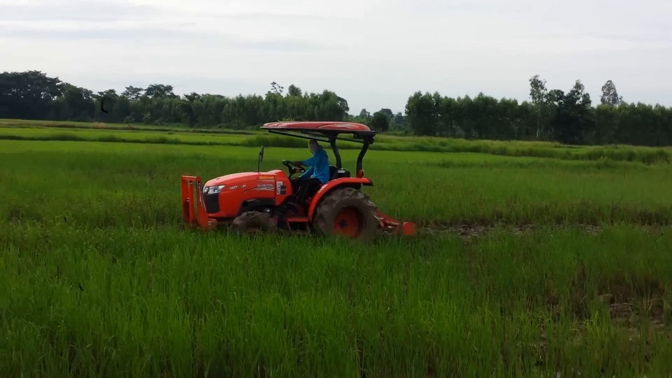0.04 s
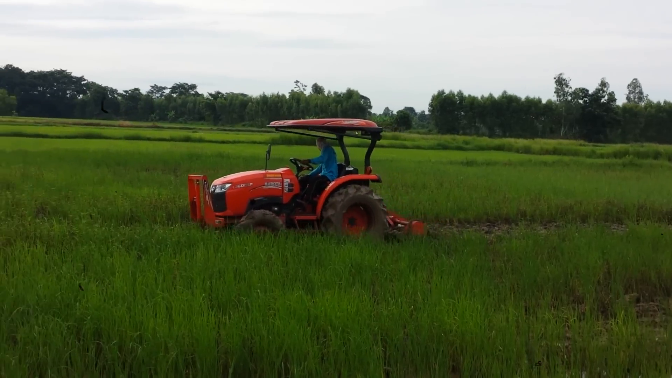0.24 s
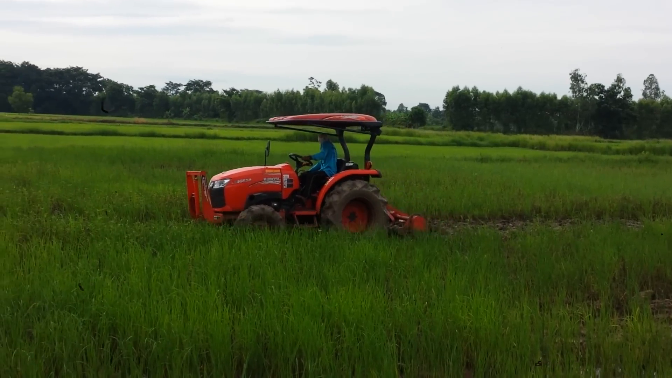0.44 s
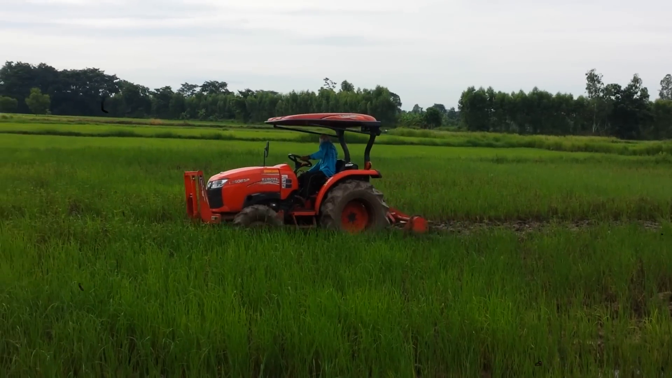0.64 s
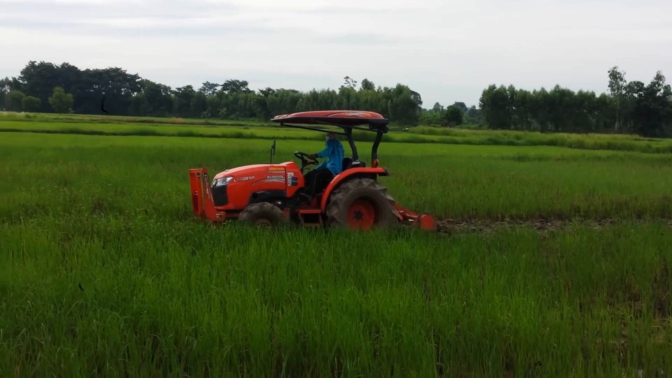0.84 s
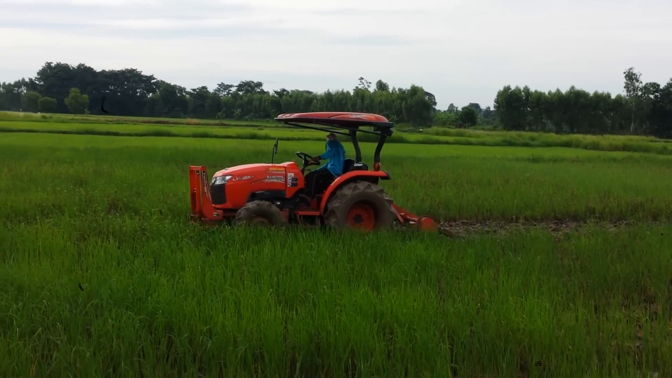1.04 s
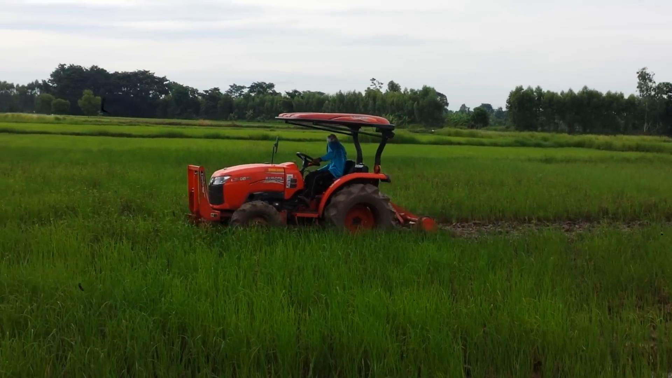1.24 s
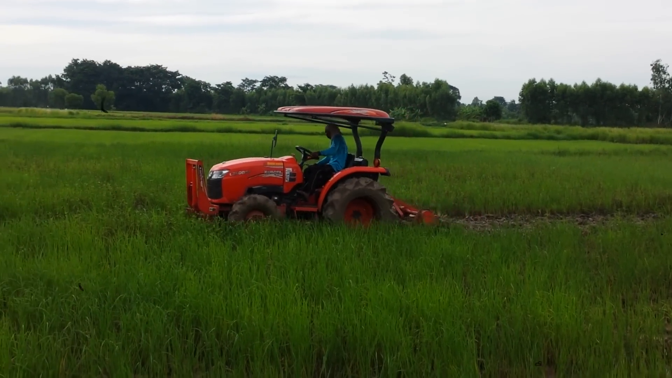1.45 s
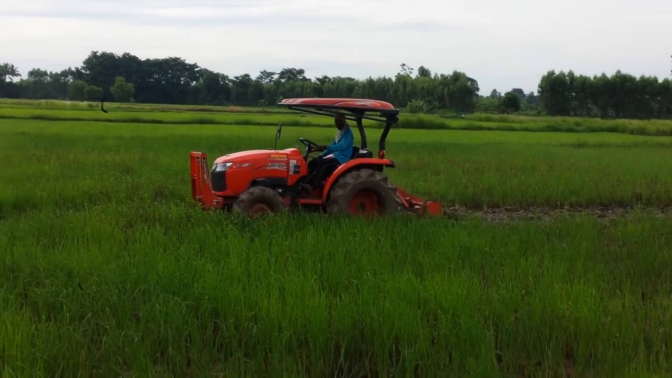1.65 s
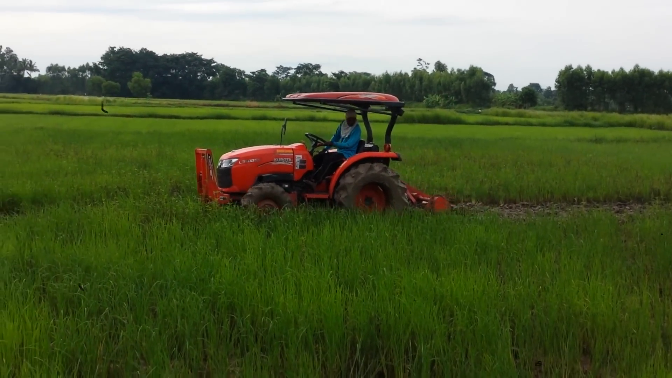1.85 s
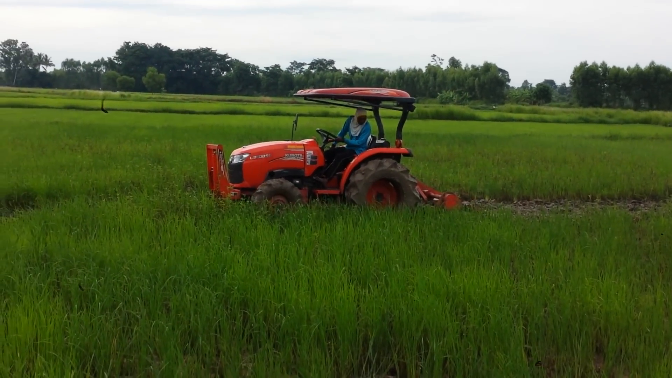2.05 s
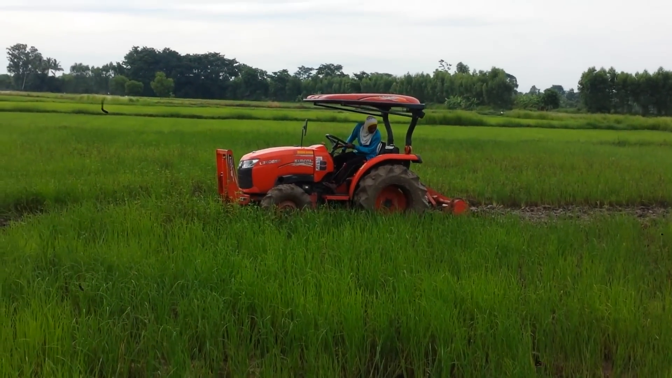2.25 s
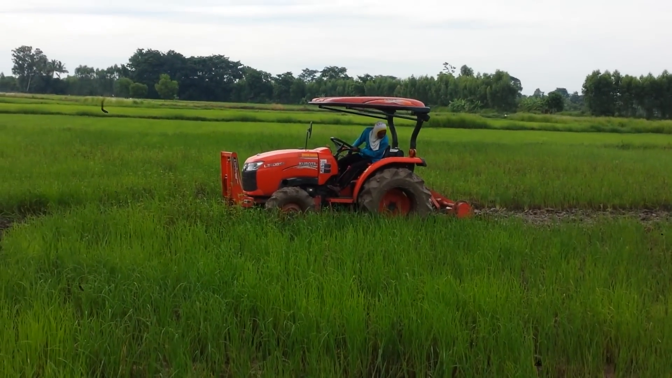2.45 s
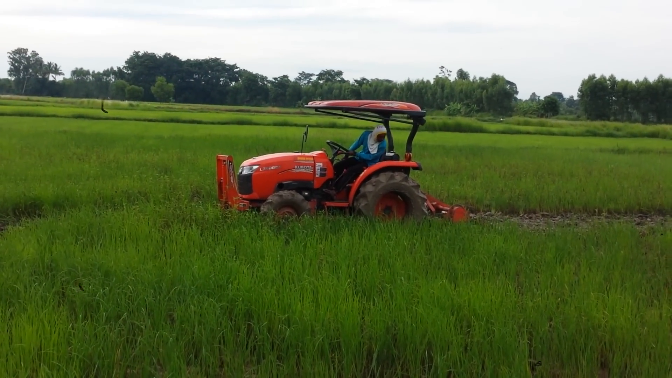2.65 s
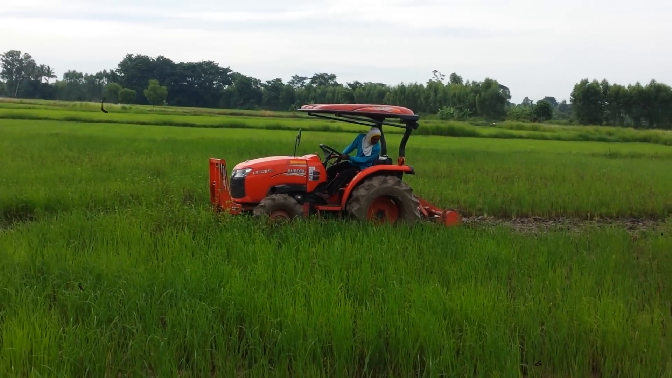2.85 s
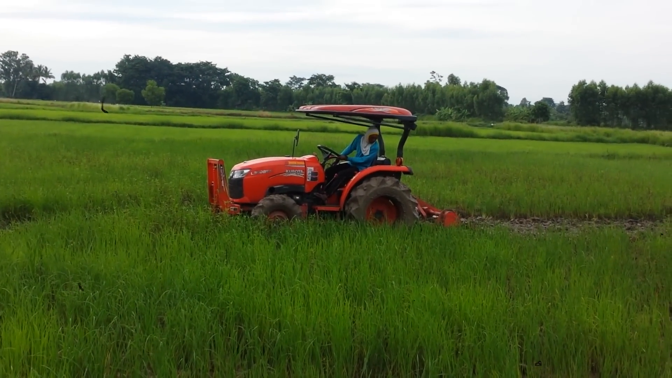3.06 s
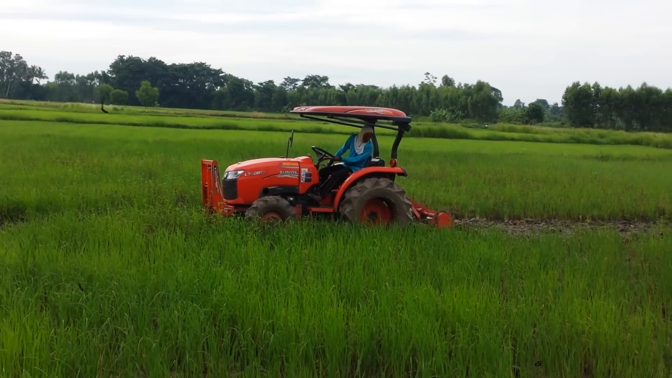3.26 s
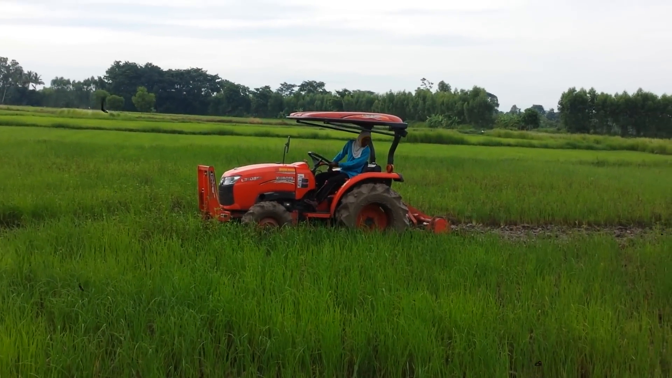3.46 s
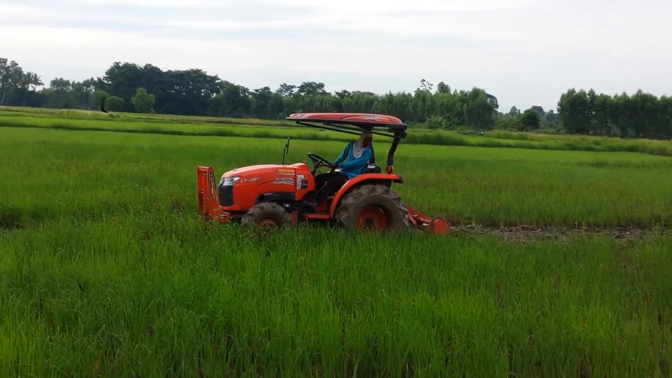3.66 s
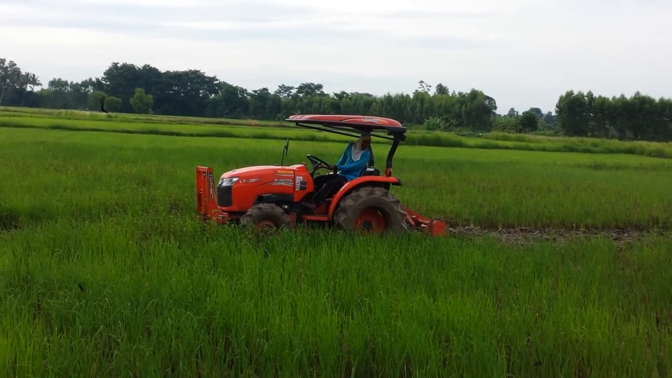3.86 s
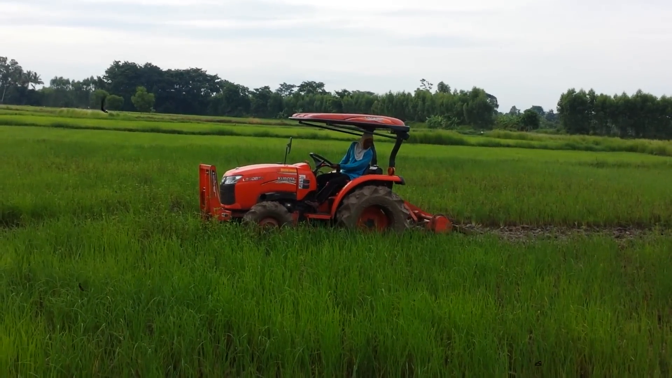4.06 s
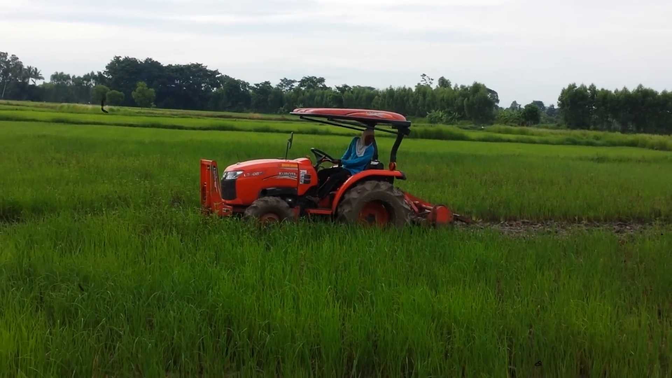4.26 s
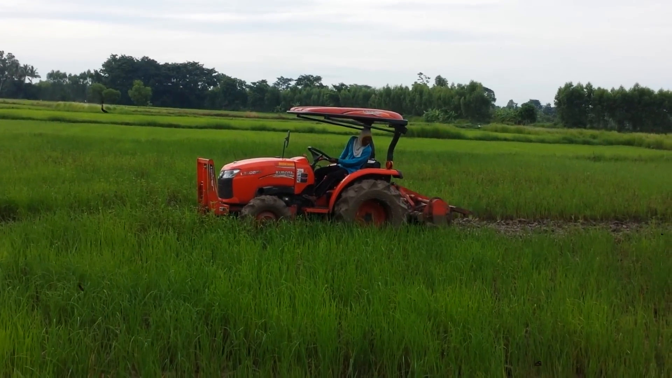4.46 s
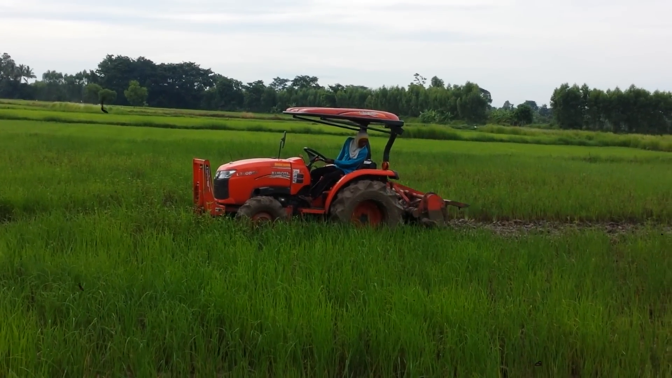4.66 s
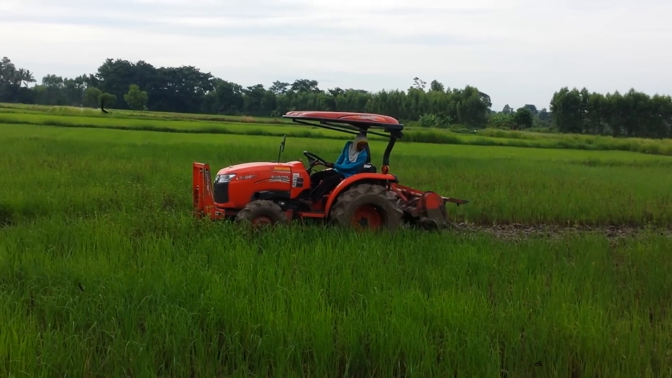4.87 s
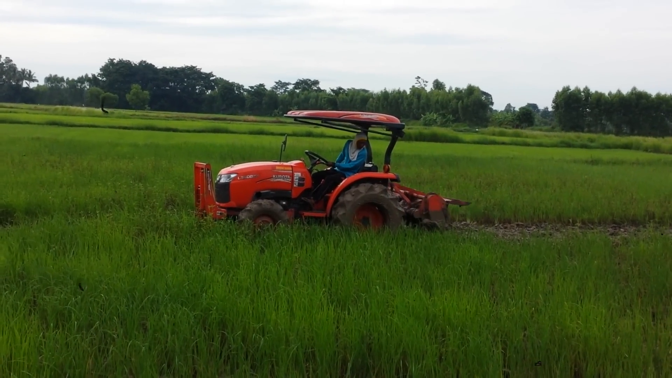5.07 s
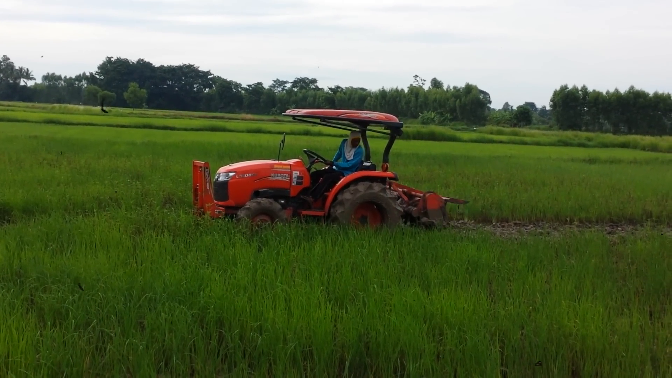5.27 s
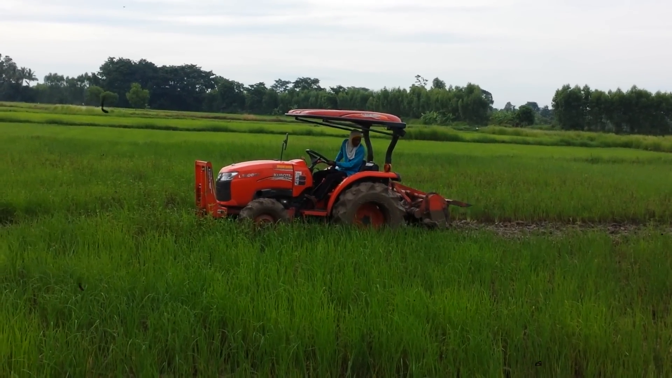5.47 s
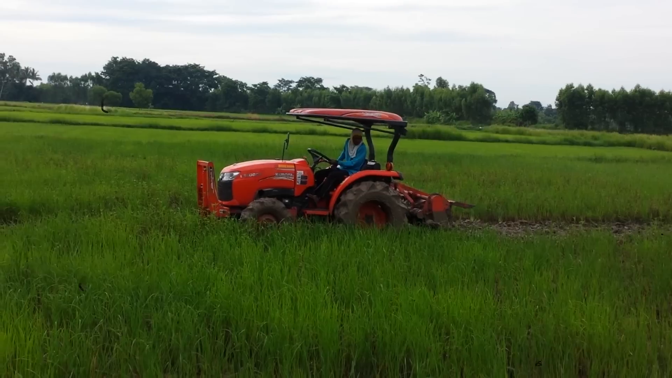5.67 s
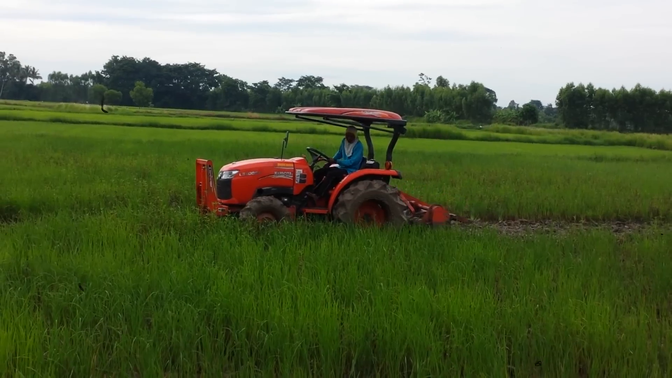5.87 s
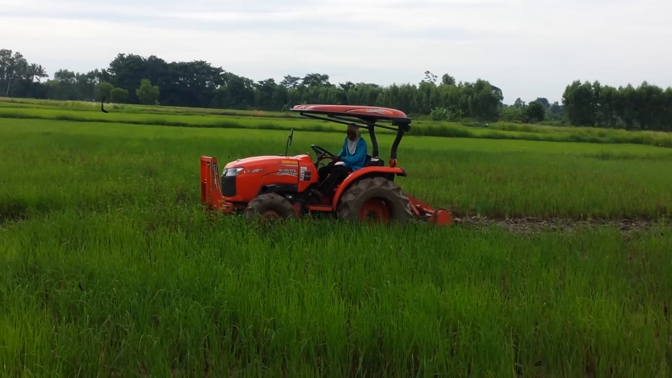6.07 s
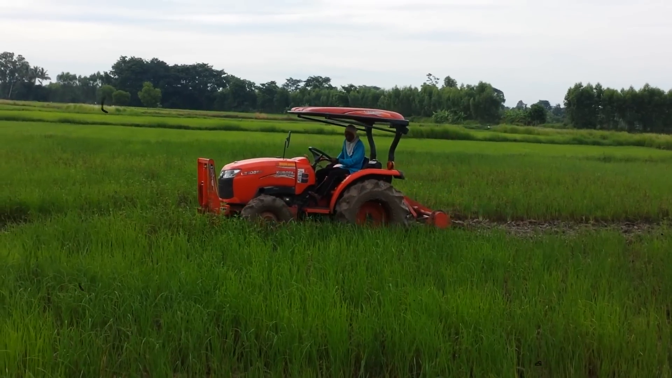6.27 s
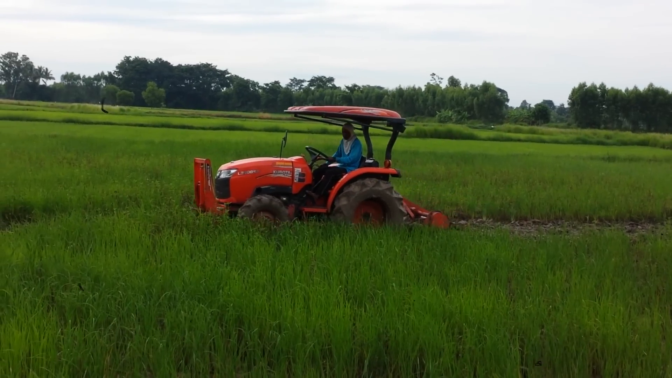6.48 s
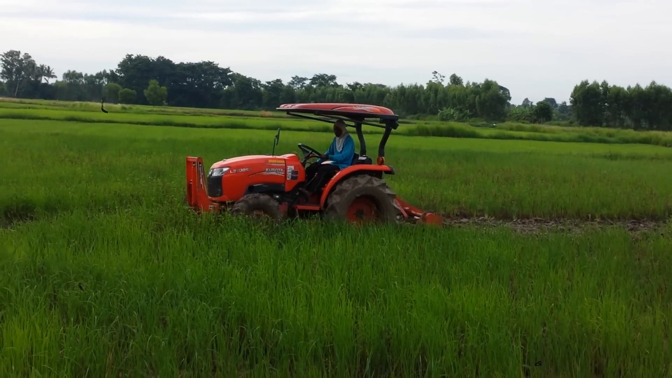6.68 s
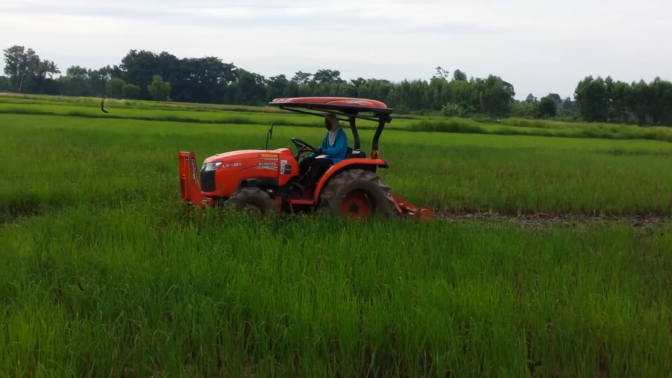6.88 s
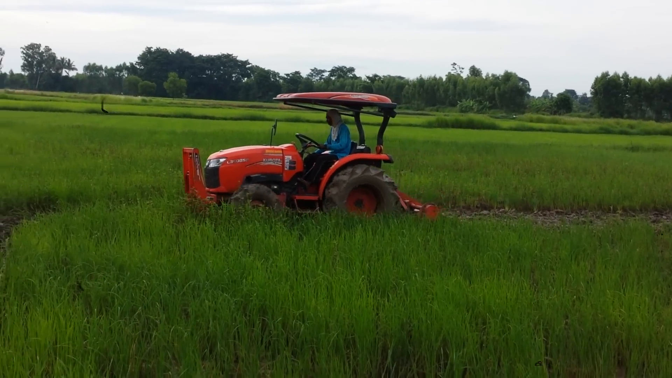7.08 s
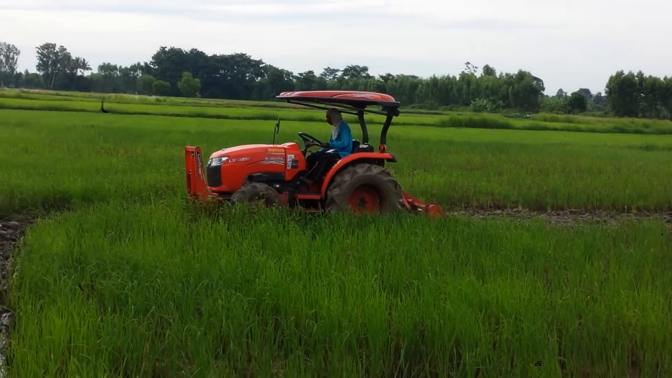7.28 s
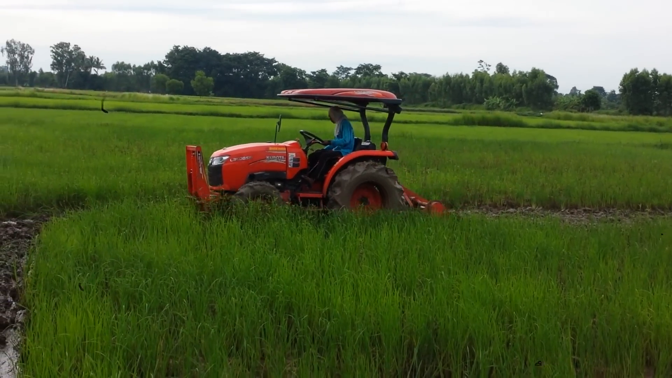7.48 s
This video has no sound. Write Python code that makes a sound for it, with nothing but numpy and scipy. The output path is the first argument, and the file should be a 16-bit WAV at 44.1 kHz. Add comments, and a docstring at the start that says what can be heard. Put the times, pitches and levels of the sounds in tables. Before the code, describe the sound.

Outdoors, a three-cylinder diesel thuds under load, drops to a slow knocking idle, then revs back up unevenly amid clanks, rumble and spray.

```python
"""Tractor tilling a flooded field

A three-cylinder diesel drags a rotary tiller through flooded ground, some way from a small handheld microphone.
The driver lifts off, the engine sags to idle, then picks up in steps under load. Exhaust thuds, summed from
multiples of the firing rate, carry the pitch. Noise and clicks ring the metal and the exhaust stub; shaped
noise makes fan, spray and churned mud. A wet-ground echo combs the exhaust crack and the metal."""
import sys
import numpy as np
from scipy import signal
from scipy.io import wavfile
from scipy.ndimage import uniform_filter1d

SR = 44100
rng = np.random.default_rng(int(sys.argv[2]) if len(sys.argv) > 2 else 0)


def log_audio(samples):
    """Write samples as a 16-bit WAV file to the path given in sys.argv[1]."""
    # one column per channel
    frames = np.atleast_2d(samples).T
    # limit to full scale, then quantise
    limited = np.clip(frames, -1, 1)
    pcm = np.round(limited * 32767).astype(np.int16)
    wavfile.write(sys.argv[1], SR, pcm)


N = 332073
TIME_S = np.arange(N) / SR
CRUISE_PER_S, IDLE_PER_S = 40, 29  # working speed, and the speed under which the engine idles (firings/s)


def gain_of(db):
    """Decibels to amplitude."""
    return 10 ** (np.asarray(db) / 20)


def evened(x):
    """Scales to rms 1."""
    return x / np.sqrt(np.mean(x ** 2) + 1e-20)


def curves(rows):
    """Every column of a table over time, sample by sample."""
    times_s, *columns = np.transpose(rows)
    return [np.interp(TIME_S, times_s, column) for column in columns]


def read(points, hz):
    """Columns of a spectrum at the given frequencies, interpolated over log frequency."""
    f, *columns = np.transpose(points)
    return np.array([np.interp(np.log(hz + 1), np.log(f + 1), column) for column in columns])


def ring(x, modes):
    """Resonances excited by a stereo drive; each filters twice, and alternating signs cut dark valleys."""
    out = np.zeros((2, N))
    for k, (hz, width_hz, *side_db) in enumerate(modes):
        b, a = signal.iirpeak(hz, hz / width_hz, fs=SR)
        rung = signal.lfilter(b, a, signal.lfilter(b, a, x))
        out += (-1) ** k * gain_of(side_db)[:, None] * rung
    return out / np.sqrt(np.mean(out.mean(0) ** 2))


# Likeness of the two microphone channels in all noise: f/Hz, correlation/1
LIKENESS = [(330, 0.97), (560, 0.87), (900, 1), (1300, 0.65), (1650, 0.76), (2000, -0.13), (2600, 0.19),
            (3400, -0.25), (5200, -0.27), (9000, -0.053)]
# Flat noise spectrum: f/Hz, left level/dB, right level/dB
FLAT = [(300, 0, 0), (3000, 0, 0)]


def noise(shape, patchy_db):
    """Stereo noise from random short-time spectra with drifting patches."""
    frames, hz = N // 128 + 5, np.fft.rfftfreq(512, 1 / SR)
    a, b, c, d, patches = rng.standard_normal((frames, 257, 5)).T
    patches = uniform_filter1d(patches, size=7, axis=0)  # over frequency
    patches = evened(uniform_filter1d(patches, size=10, axis=1))  # over time
    same = np.clip(read(LIKENESS, hz)[0], -1, 1)[:, None]
    left = a + 1j * b
    right = same * left + np.sqrt(1 - same ** 2) * (c + 1j * d)
    level_db = read(shape, hz)[:, :, None] + patchy_db * patches
    spectra = np.array([left, right]) * gain_of(level_db)
    return signal.istft(spectra, nperseg=512, noverlap=384)[1][:, :N]


# Engine speed: t/s, firing rate/(firings per s)
SPEED = [(0.0, 52.74), (0.42, 50.73), (1.68, 49.33), (1.96, 50.82), (2.28, 40.71), (3.05, 21.99),
         (3.1, 24.96), (3.55, 25.96), (3.81, 37.16), (4.29, 36.86), (4.49, 48.38), (4.72, 49.49),
         (4.95, 41.85), (5.4, 44.42), (5.72, 41.62), (6.0, 42.18), (6.24, 37.8), (6.64, 40.77),
         (7.2, 37.91), (7.53, 38.02)]


def firings():
    """Running count of firings, the clock of the engine, and seconds since the last one."""
    rate = curves(SPEED)[0]
    turns = np.cumsum(rate) / SR + .13
    return turns, turns % 1 / rate


# Strength of each of the three cylinders: level/dB
CYLINDERS_DB = [-0.8, -0.23, -0.3]


def per_firing(turns, spread_db):
    """A random strength for each firing, on top of its cylinder's own."""
    count = turns.astype(int)
    random_db = spread_db * rng.standard_normal(600)[count]
    return gain_of(random_db + np.array(CYLINDERS_DB)[count % 3])


def fronts(turns, spread_db):
    """One click at each firing, of uneven strength."""
    return evened(np.diff(np.floor(turns), prepend=0) * per_firing(turns, spread_db))


def load():
    """Share of full fuel, 0 to 1, judged from the strength of the thud."""
    return np.clip((curves(THUD)[0] + 27) / 8, 0, 1)


def idling():
    """1 at idle speed, 0 above it."""
    return np.clip((IDLE_PER_S - curves(SPEED)[0]) / 2, 0, 1)


def burst(since, fall_s):
    """Envelope after a firing: a dry tick off load, a slower swell under load."""
    rise_s = 0.0014 + 0.00064 * load()
    return np.exp(-since / fall_s) * (1 - np.exp(-since / rise_s))


# Spectrum of the mud rumble: f/Hz, left relative level/dB, right relative level/dB
CHURN = [(22, -32, -31), (40, -17, -16), (61, -3, -9), (125.6, -17, -22), (188, 3.5, 4), (250, 1, 3),
         (321.4, -6, -6), (413, -17, -10.5), (647, -21.5, -23.5), (800, -10.5, -8.5), (1300, -22, -24.5),
         (2170, -12, -19), (2350, -9, -18.5), (3730, -19.5, -24.5), (6500, -50, -48)]
# Gear whine: multiple of the firing rate/1, amplitude re rumble rms/dB
GEARS = [(11.3, -19), (12.55, -16)]
# Work of the tiller, before each layer's offset: t/s, metal clatter level/dB, jet and spray hiss level/dB
WORK = [(0, -26.5, -31.5), (1.2, -27, -32), (1.83, -27.5, -33), (2.07, -37, -42), (2.98, -50, -51),
        (3.08, -39, -46.5), (3.55, -40.5, -47), (3.7, -31, -39.5), (3.8, -30, -43), (4.3, -33, -40.5),
        (4.43, -27.5, -35), (4.72, -28.5, -40.5), (4.79, -38, -41.5), (5.0, -29.5, -42), (5.25, -35, -41),
        (5.42, -31, -41), (6.19, -32, -40), (6.3, -31, -35.5), (7.38, -28.5, -34.5), (7.53, -29, -33.5)]


def churn(turns):
    """Blades in mud and body drone make a broad rumble; gear teeth whine faintly just after the pick-up."""
    meshing = np.exp(-((TIME_S - 4.25) / .52) ** 4)
    whine = sum(gain_of(db) * np.sin(2 * np.pi * k * turns) for k, db in GEARS)
    # the rumble grows with engine speed and with the spray
    level_db = -25.5 + 0.22 * (curves(SPEED)[0] - CRUISE_PER_S) + 0.57 * (curves(WORK)[1] + 37)
    return gain_of(level_db) * (evened(noise(CHURN, 1.5)) + meshing * whine)


# Spectrum of fan, jet and spray: f/Hz, left relative level/dB, right relative level/dB
HISS = [(3400, -22.5, -23), (4270, -18, -20.5), (5890, -12.5, -14.5), (7250, -20, -22), (8960, -18, -22.5),
        (10620, -30.5, -24.5), (12800, -41, -35.5), (14200, -45, -32), (15100, -52, -41)]


def hiss(turns, since):
    """Fan, exhaust jet and flung water: treble noise that puffs with each firing, the harder the more load."""
    delayed = burst(np.maximum(since - .002, 0), .009)
    puff = (.3 + .9 * load()) * per_firing(turns, 2.5) * delayed
    spray = (1.02 + puff) * noise(HISS, 1.62)
    spray /= np.sqrt(uniform_filter1d((0.36 + puff) ** 2, size=9000))  # levels out slow swells, keeps the puffs
    return gain_of(curves(WORK)[1] + 0.98) * spray / np.sqrt(np.mean(spray.mean(0) ** 2))


# Linkage clanks and rattles, before onset and panning: t/s, level/dB, centre f/Hz, 60 dB decay/s
CLANKS = [(1.895, -31.5, 4570, 0.039), (3.66, -32.5, 3430, 0.072), (3.71, -31.5, 3400, 0.066),
          (4.33, -38, 3970, .08), (4.88, -44, 3920, 0.23), (5.205, -25.5, 800, 0.088),
          (5.215, -21.5, 260, .08), (5.25, -36.5, 5780, 0.065), (5.272, -34, 6100, 0.12),
          (5.555, -24, 266, 0.15), (5.86, -37, 3770, 0.11), (5.95, -41, 4020, .07),
          (6.265, -23.5, 2800, 0.078), (6.346, -23.5, 2750, 0.051), (6.72, -28, 2810, 0.062),
          (6.9, -34, 2200, 0.12)]


def clanks():
    """Each clank is a cluster of eight close rings over a puff of noise, a little to the left."""
    out, t = np.zeros(N + SR), np.arange(8000) / SR
    draws = rng.random((len(CLANKS), 16))
    puffs = rng.standard_normal((len(CLANKS), 8000))
    for (start_s, db, hz, t60), draw, puff in zip(CLANKS, draws, puffs):
        rings = sum(np.sin(2 * np.pi * (hz * (.94 + 0.117 * f) * t + p)) for f, p in draw.reshape(8, 2))
        band = signal.butter(1, [hz / 1.15, hz * 0.91], "band", fs=SR)
        body = evened(signal.lfilter(*band, puff))
        envelope = gain_of(db - 60 * t / t60 + 0.5) * (1 - np.exp(-t / 0.0016))
        at = round(start_s * SR)
        out[at:at + len(t)] += envelope * (rings + body)
    return out[:N] * gain_of([[1.5], [-1.5]])


# Block and bonnet resonances: f/Hz, width/Hz, left relative level/dB, right relative level/dB
PANELS = [(1426, 97, 3, -4.5), (1666, 254, 2.5, 2), (2072, 116, 4.5, -13), (2258, 166, 1.5, -11),
          (2430, 210, 5, -7), (2686, 193, 6.5, -4)]
# Tiller guards and links: f/Hz, width/Hz, left relative level/dB, right relative level/dB
GUARDS = [(2852, 67, 8, -21), (3060, 250, 8, -0.5), (3347, 96, 1, -3.5)]
# Uneven knock at idle, on the panels, one entry per cylinder: extra level/dB
PANEL_KNOCK_DB = [0, 2.2, -1.5]
# Uneven knock at idle, on the guards, one entry per cylinder: extra level/dB
GUARD_KNOCK_DB = [-1.5, 2.5, 0]


def shake(turns, since, modes, level_db, cylinder_db):
    """Diesel knock and loose ticks shake metal; between them it buzzes on, more so at speed."""
    rate = curves(SPEED)[0]
    uneven = gain_of(idling() * np.array(cylinder_db)[turns.astype(int) % 3])
    knock = uneven * per_firing(turns, 1.6) * burst(since, .010)
    buzz = .12 * (rate / 45) ** 2
    force = (buzz + knock) / np.sqrt(uniform_filter1d((buzz + knock) ** 2, size=9000))
    tick_size = gain_of(2.0 * np.minimum(rng.exponential(1, N), 5))
    ticks = tick_size * (rng.random(N) < 250 / SR) * rng.choice([-1, 1], N)  # about 250 a second
    # the bare rap stands out at low speed and under load
    rap = (.45 * (35 / rate) ** 2 + .2 * load()) * uneven * fronts(turns, 1.5)
    drive = evened(force * noise(FLAT, 1.9)) + .33 * evened(ticks) + rap
    return gain_of(level_db) * ring(drive, modes)


# Loose cover: f/Hz, width/Hz, left relative level/dB, right relative level/dB
COVER = [(1680, 140, 0.5, -0.5)]


def tappet(turns):
    """Every third firing rings a loose cover, once the governor feeds fuel again at idle."""
    refuel_s, level_db = 3.05, -59
    fed = idling() * (TIME_S > refuel_s) * (turns.astype(int) % 3 == 0)
    return gain_of(level_db) * ring(np.array([fed, fed]) * fronts(turns, 1.7), COVER)


# Exhaust stub: f/Hz, width/Hz, left relative level/dB, right relative level/dB
PIPE = [(694, 112, 5, 4.3), (1003, 310, -12, -0.5), (1130, 105, 3.5, 10.5)]
# Open mouth of the pipe: f/Hz, width/Hz, left relative level/dB, right relative level/dB
MOUTH = [(870, 520, 0, 1.4)]
# Firings with a changed crack, mostly harder, one softer: t/s, level change/dB
CHANGED_CRACKS = [(.48, -3), (.58, 3), (.601, 7.5), (.70, 6), (.739, 6), (.818, 7.5), (.877, 7.5),
                  (.896, 6), (1.079, 5.5), (1.5, 7), (1.642, 8), (3.645, 10), (6.341, 6), (7.361, 3.5)]


def crack(turns, since):
    """The steep front of each pulse snaps at the pipe mouth; the gas rushing after it rings the stub."""
    times_s, change_db = np.transpose(CHANGED_CRACKS)
    near = np.exp(-((TIME_S[:, None] - times_s) / .006) ** 2)
    snap = ring(fronts(turns + .03, 1.5) * gain_of(near @ change_db), MOUTH)
    rush = (.24 + per_firing(turns, 2.5) * np.exp(-since / .004)) * noise(FLAT, 1.4)
    share = .78  # of the snap
    level_db = -34.5 + 1.09 * (curves(WORK)[1] + 36)  # follows the hiss
    return gain_of(level_db) * (ring(rush, PIPE) * np.sqrt(1 - share ** 2) - share * snap)


# Extra path off the wet ground: t/s, delay/ms
ECHO = [(0, 1.53), (2, 1.56), (6.1, 1.593), (6.4, 1.76), (7.53, 1.73)]


def ground(x, share=0.31):
    """A grazing echo of opposite sign combs the sound and loses its treble."""
    late = np.arange(N) - curves(ECHO)[0] * SR / 1000
    dull = signal.lfilter([.3], [1, -.7], x)
    # two samples earlier, to offset the lag of the dulling filter
    return x - share * np.array([np.interp(late + 2, np.arange(N), side) for side in dull])


# Exhaust pulse strength, set by pedal and load, before firing spread and panning: t/s, level/dB
THUD = [(0, -14), (1.82, -13.5), (1.87, -18), (1.91, -26), (1.96, -23.5), (2.47, -24), (2.75, -29),
        (3.05, -30), (3.1, -25), (3.22, -28.5), (3.56, -29), (3.65, -17.5), (3.88, -19), (4.24, -20.5),
        (4.42, -12.5), (4.56, -17.5), (4.7, -15), (4.77, -29.5), (5.04, -17), (5.13, -19.5), (5.51, -21),
        (5.7, -17.5), (6.12, -16), (6.26, -13.5), (7.53, -14)]
# Hum at the firing rate, booming as the driver lifts off, before panning: t/s, level/dB
HUM = [(0, -30), (1.83, -32.5), (1.91, -23), (2.45, -40), (2.75, -56), (4.3, -50), (4.4, -39),
       (4.68, -49.5), (4.78, -23), (4.92, -39), (5.5, -41), (5.9, -53), (6.5, -41), (7.53, -46)]
# Make-up of the thud: multiple of the firing rate/1, relative level/dB
ORDERS_DB = [(2, -0.5), (3, -2.5), (4, -5), (5, -6.5), (6, -12), (7, -19.5), (8, -28), (9, -26), (10, -48)]
# Narrow muffler booms under load: f/Hz, width/Hz, boost/dB
BOOMS = [(132.2, 3.9, 5.5), (208.4, 14.5, 3.5)]


def exhaust(turns, cut_hz=65, damping=1.05):
    """Low orders of the exhaust pulse: a sharp dip, then a swing; the small microphone cuts the bass."""
    thud_db, hum_db, rate = curves(THUD)[0], curves(HUM)[0], curves(SPEED)[0]
    faster = rate - CRUISE_PER_S
    dull_db = 0.4 + 0.13 * faster + load() - 0.5 * idling()  # fall per order: steeper at speed and under load
    third_db = 14 * idling() - 3 * (1 - load()) + .2 * faster  # swells at idle, sinks off the pedal
    order, order_db = np.array(ORDERS_DB).T[:, :, None]
    boom_db = load() * sum(db * np.exp(-((order * rate - hz) / width) ** 2) for hz, width, db in BOOMS)
    s = 1j * order * rate / cut_hz
    microphone = abs(s ** 2 / (1 + damping * s + s ** 2))
    parts = gain_of(order_db - dull_db * (order - 2) + third_db * (order == 3) + boom_db) * microphone
    parts /= np.sqrt((parts ** 2).sum(0) / 2)
    lead = .75 - .2 * order  # low orders run ahead, so the swing follows the dip
    lead = lead + .3 * (1 - load()) * (order - 3) ** 2  # weak pulses spread out in the muffler
    thud = -(parts * np.cos(2 * np.pi * order * turns + lead)).sum(0)
    strength = uniform_filter1d(per_firing(turns + 0.25, 0.15), size=150)
    hum = np.sqrt(2) * gain_of(hum_db) * np.sin(2 * np.pi * turns)
    return (gain_of(thud_db) * strength * thud + hum) * gain_of([[-.8], [.7]])


def scene():
    """All parts of the tractor but the clanks share one train of firings."""
    turns, since = firings()
    clatter_db = curves(WORK)[0]
    rattle_db = -38.5 + 1.4 * (clatter_db + 30)  # guards follow the clatter
    panels = shake(turns, since, PANELS, clatter_db - 2.5, PANEL_KNOCK_DB)
    guards = shake(turns, since, GUARDS, rattle_db, GUARD_KNOCK_DB)
    background = churn(turns) + hiss(turns, since) + clanks()
    echoed = ground(panels + guards + tappet(turns) + crack(turns, since))
    return background + echoed + exhaust(turns)


def record(dry):
    """The band limit of the recorder, a steep low-pass."""
    edge_hz = 15400
    low_pass = signal.firwin(511, edge_hz, window=("kaiser", 9), fs=SR)
    return signal.oaconvolve(dry, low_pass[None], "same")


dry = scene()
out = record(dry)
log_audio(out)
```